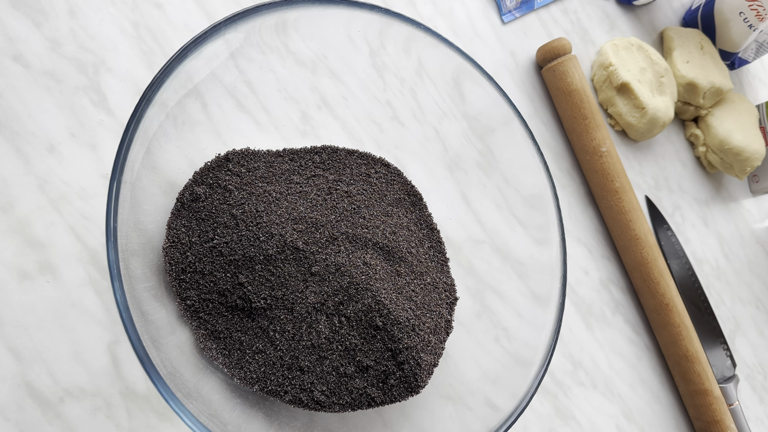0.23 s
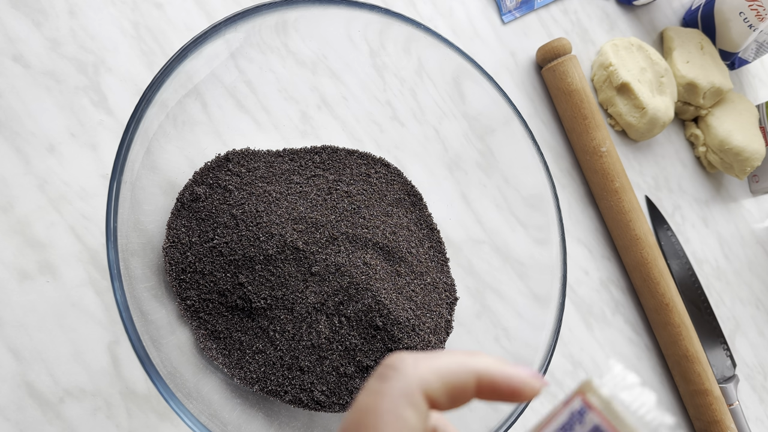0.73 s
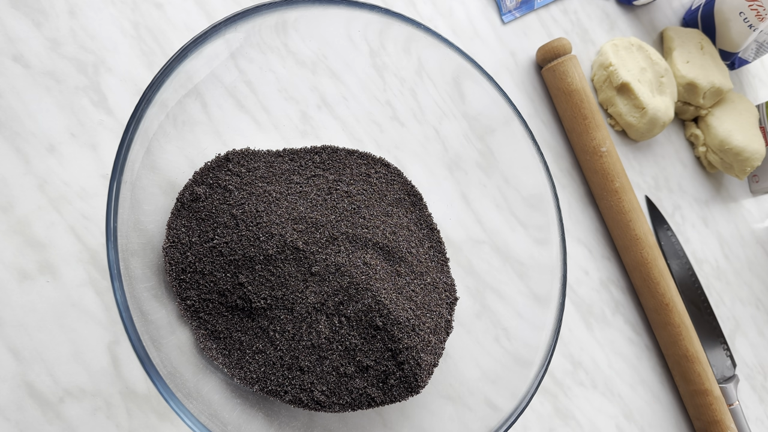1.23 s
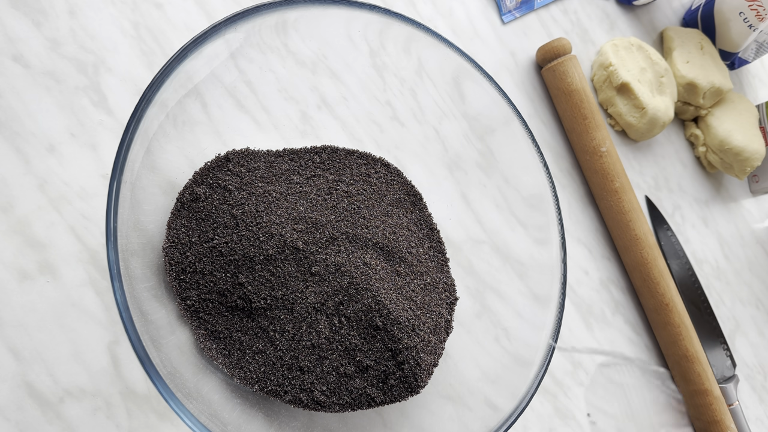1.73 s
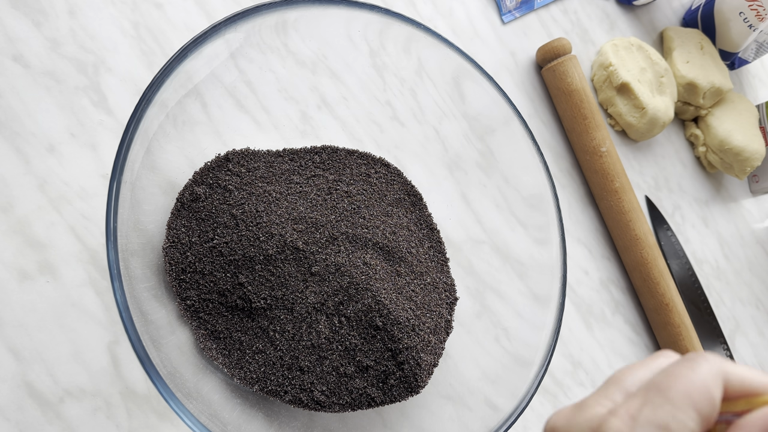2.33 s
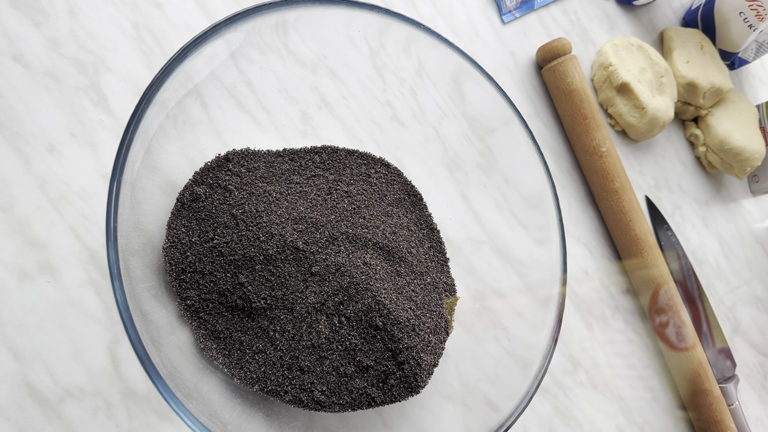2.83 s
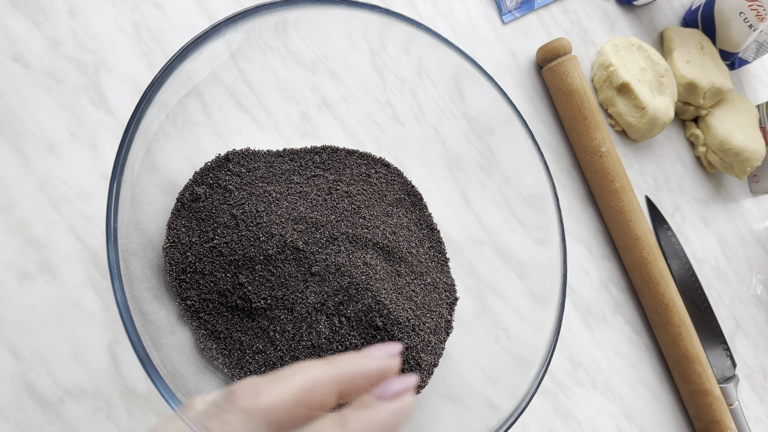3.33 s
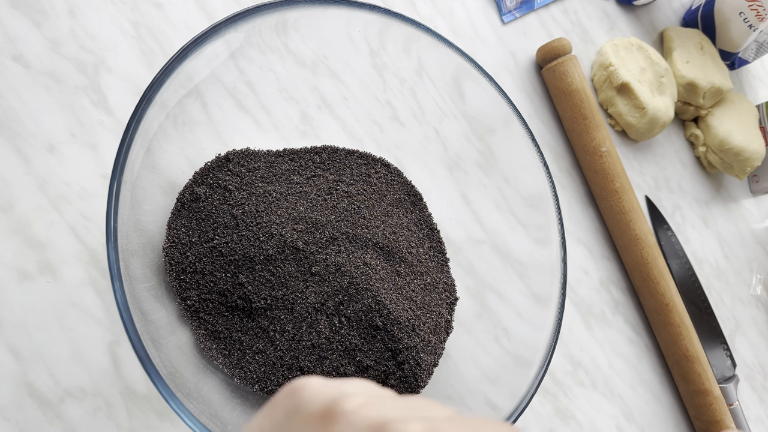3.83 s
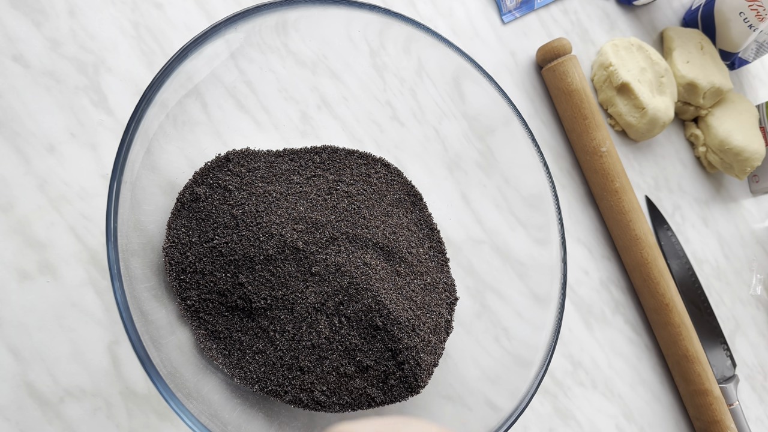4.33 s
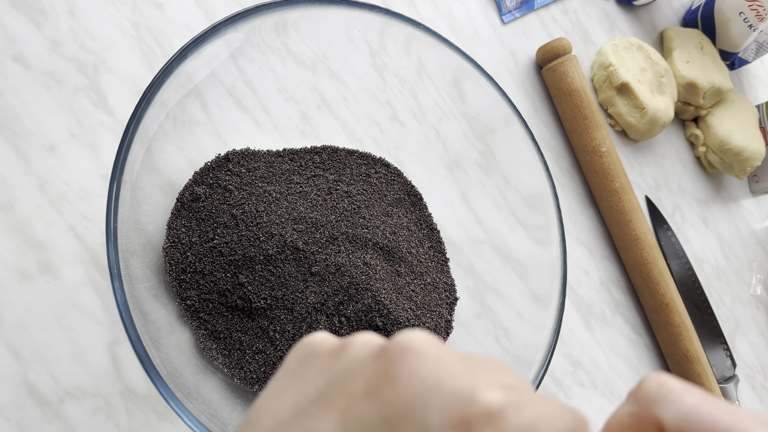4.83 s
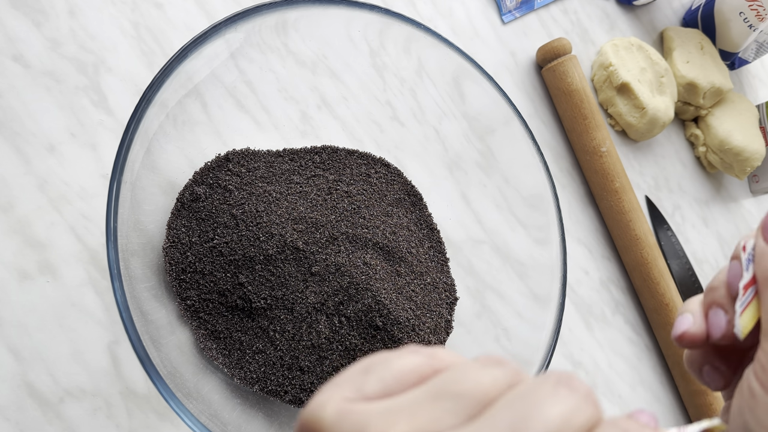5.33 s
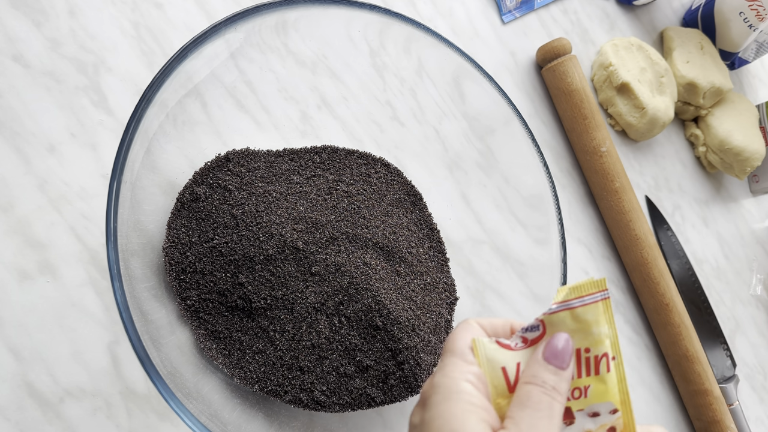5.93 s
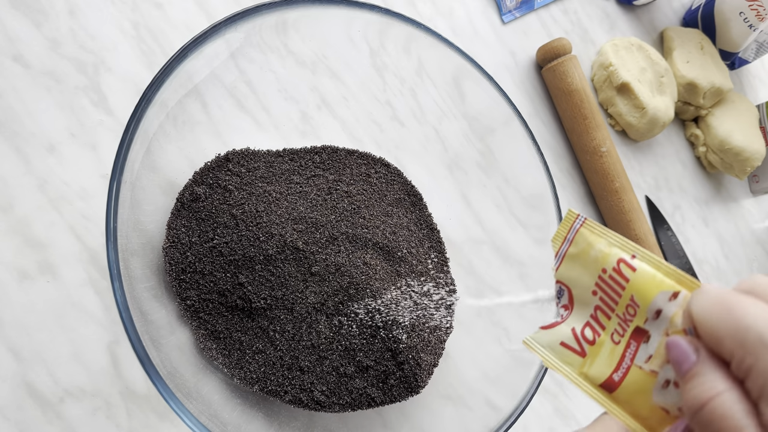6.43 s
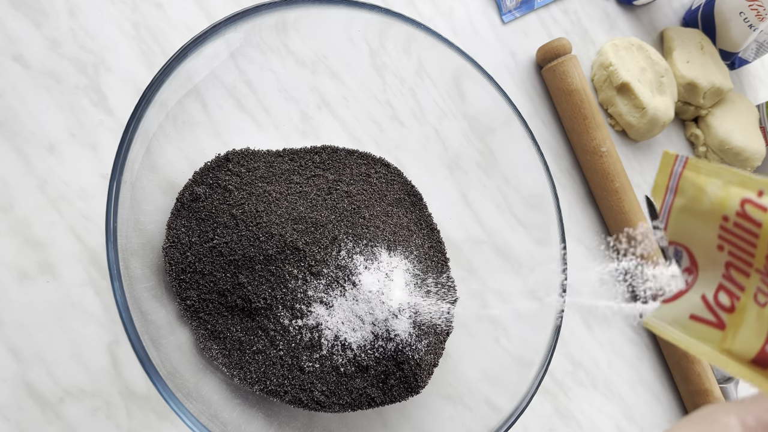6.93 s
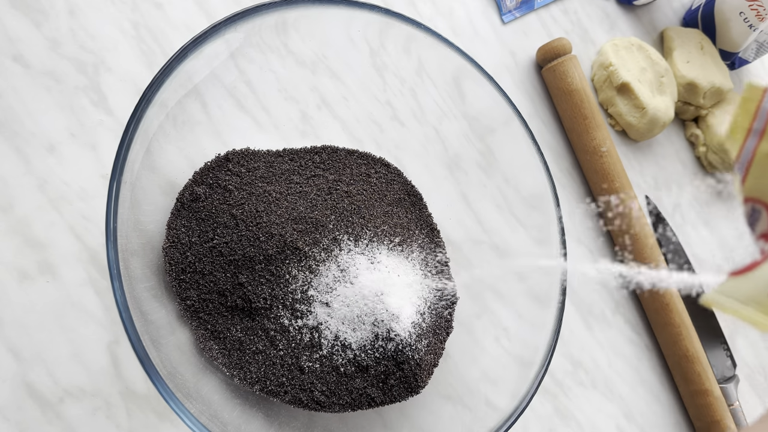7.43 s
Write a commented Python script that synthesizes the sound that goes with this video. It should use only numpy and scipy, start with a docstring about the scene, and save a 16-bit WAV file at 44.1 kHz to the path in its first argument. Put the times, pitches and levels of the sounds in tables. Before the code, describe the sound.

Close, crisp crumpling of a small paper sachet, dense at first, then easing into sliding rustles and a dull hand brush on the table. Sparse crackles follow as another sachet is picked up, ripped open briskly, and emptied in a faint fine hiss. A low appliance hum runs beneath; small live kitchen, close stereo microphone.

```python
"""Crumpled paper: small sugar sachets are handled close by over a kitchen table, and an appliance hums.
The first is crumpled; the next is picked up, torn open and its sugar poured into a bowl. Creases are shaped
noise pulses and a click that ring panel resonances; rustle, tearing fibres, a brushing hand and sugar are random
clicks through resonators. Table and bowl echo, the kitchen reverberates; hum is sines, room air filtered noise.
Each squeeze of the fingers swells the rustle by one rule. Levels [dB] are relative, before any layer gain."""
import sys
import numpy as np
from scipy import signal
from scipy.fft import rfft, irfft, next_fast_len
from scipy.io import wavfile
from scipy.ndimage import uniform_filter1d, map_coordinates

SR = 44100
rng = np.random.default_rng(int(sys.argv[2]) if len(sys.argv) > 2 else 0)


def pcm_store(signal):
    """Save signal as 16-bit PCM."""
    levels = np.round(np.clip(np.atleast_2d(signal), -1, 1) * 32767)
    wavfile.write(sys.argv[1], SR, levels.astype(np.int16).T)


N = 339570
TOP_HZ = 15900  # upper limit of the band


def amp(db):
    """Decibel law: level to amplitude gain."""
    return 10 ** (np.asarray(db) / 20)


def unit(x):
    """Normalisation to an rms of 1."""
    return x / np.sqrt(np.mean(x ** 2) + 1e-20)


def along(points, hz):
    """Interpolation of (frequency [Hz], value) points on a logarithmic frequency axis."""
    f, v = np.transpose(points)
    return np.interp(np.log(hz + 1), np.log(f + 1), v)


def levels(rows):
    """Envelopes linear in decibels: one gain curve per level column, -120 dB before the first row."""
    s, *columns = np.transpose(rows)
    t = np.arange(N) / SR
    return [amp(np.interp(t, s, column, left=-120)) for column in columns]


def wobble(rate):
    """Slow random modulation: a smooth curve through rate random knots a second."""
    knots = rng.standard_normal(int(N * rate / SR) + 4)
    return map_coordinates(knots, [np.arange(N) * rate / SR])


def filtered(x, response):
    """Linear filtering: the spectrum of x times a complex response of frequency."""
    m = next_fast_len(N + SR // 2)
    hz = np.fft.rfftfreq(m, 1 / SR)
    return irfft(rfft(x, m) * response(hz), m)[..., :N]


def causal(db):
    """Minimum phase by folding the cepstrum: a response with these gains that rings only after the blow."""
    cepstrum = irfft(np.log(amp(db) + 1e-9))
    half = len(cepstrum) // 2
    fold = np.r_[1, np.full(half - 1, 2), 1, np.zeros(half - 1)]
    return np.exp(rfft(cepstrum * fold))


def ring(x, spectrum, size=2048):
    """Convolution: each click excites one impulse response with the given spectrum."""
    pulse = irfft(causal(along(spectrum, np.fft.rfftfreq(size, 1 / SR))))
    return signal.oaconvolve(x, pulse[None], axes=1)[:, :N]


def bump(hz, centre, octaves):
    """Resonance curve on an octave scale, 1 at its centre and 1/2 at the given distance in octaves."""
    return 1 / (1 + (np.log2((hz + 1) / centre) / octaves) ** 2)


def grains(rate, spread_db, apart):
    """Random impulses: rate clicks a second of scattered size, each of its own strength at the two ports."""
    chance, size, lean = rng.random(N), rng.standard_normal(N), rng.standard_normal(N)
    heights = amp(spread_db * np.minimum(size, 2))
    clicks = (chance < rate / SR) * heights * rng.choice([-1, 1], N)
    return clicks * np.array([1 + apart * lean, 1 - apart * lean])


def avalanches(rate, life, calm):
    """Avalanche statistics: buckling bursts, rate a second, decay with time constant life [s] over a calm share."""
    starts = (rng.random(N) < rate / SR) * rng.uniform(.4, 1, N)
    power = signal.lfilter([1], [1, -np.exp(-2 / (life * SR))], starts ** 2)
    return np.sqrt((calm + power / power.mean()) / (calm + 1))


def buckles(x, spectrum, low_hz, high_hz, peak_db, octaves=0.74, size=1024, count=6):
    """Local resonance: every few milliseconds a random facet takes the pulses and rings at its own pitch."""
    hz, hop = np.fft.rfftfreq(size, 1 / SR), SR // 160
    turn = rng.integers(count, size=N // hop + 1).repeat(hop)[:N]
    out = np.zeros((2, N))
    for k, pitch_hz in enumerate(np.geomspace(low_hz, high_hz, count)):
        pulse = irfft(causal(along(spectrum, hz) + peak_db * bump(hz, pitch_hz, octaves)))
        out += signal.oaconvolve(x * (turn == k), pulse[None], axes=1)[:, :N]
    return unit(out)


# left-right likeness of diffuse sound: (frequency [Hz], coherence [0-1])
COHERENCE = [(60, 0.94), (130, 0.94), (300, 0.61), (640, 0), (1400, 0.23), (4000, 0)]


def diffuse(pair):
    """Diffuse-field coherence: two unrelated signals are made alike in the bass, as sound from all sides is."""
    hz = np.fft.rfftfreq(pair.shape[1], 1 / SR)
    turn = np.arccos(np.clip(along(COHERENCE, hz), -1, 1)) / 2
    mid, side = rfft(pair) * [np.cos(turn), np.sin(turn)]
    return irfft([mid + side, mid - side], pair.shape[1])


# mains hum of the appliance: (frequency [Hz], rms level [dB])
HUM_LINES = [(49, -54), (98, -64.5), (150, -76), (300, -73)]
# colour of the room air: (frequency [Hz], level per Hz [dB])
AIR_COLOUR = [(20, -13), (45, -4), (62, -1.5), (83, 10), (115, -4.5), (150, 0.5), (200, -16), (310, -7.5),
              (600, -13), (1000, -22), (1600, -37), (5000, -35), (15000, -76)]
# level of the low hum band between 65 and 125 Hz over time: (time [s], level [dB])
HUM_BAND_LEVEL = [(0, 1.5), (2.75, -2.5), (3.1, -8), (3.55, -6.5), (3.95, -2)]


def background():
    """Additive synthesis: unsteady sine hum over air noise; the level between 65 and 125 Hz varies with time."""
    t = np.arange(N) / SR
    hum = np.zeros(N)
    for hz, db in HUM_LINES:
        height = np.sqrt(2) * amp(db + 2.0 * wobble(3.6))
        hum += height * np.sin(2 * np.pi * hz * t + 0.238 * wobble(2.0))
    noise = diffuse(rng.standard_normal((2, N)))
    air = unit(filtered(noise, lambda hz: amp(along(AIR_COLOUR, hz))))
    floor = hum + amp(-56.5) * air
    band_gain, = levels(HUM_BAND_LEVEL)
    hum_band = filtered(floor, lambda hz: (hz > 65) & (hz < 125))
    return floor + (band_gain - 1) * hum_band


# how firmly the hands keep working the paper between squeezes: (time [s], rustle level [dB])
GRIP_LEVEL = [(0, -38.5), (1.33, -36.5), (1.41, -43.5), (1.5, -36.5), (1.77, -41), (2.18, -40), (2.25, -47),
              (2.7, -54.5), (2.87, -70.5), (3.15, -55), (3.5, -59.5), (3.75, -54), (4.1, -64.5),
              (4.33, -60), (4.43, -49), (4.64, -60), (4.74, -62), (4.9, -52), (5.02, -61), (5.45, -62.5),
              (5.75, -56), (5.92, -56), (6.15, -65), (7.7, -85)]
# the fingers squeeze or shift the sachet:
# (time [s], length [s], crisp rustle level [dB], flexing panel level [dB])
FINGER_SQUEEZES = [(0.0, 0.017, -26.5, -50), (0.145, 0.02, -23.5, -42), (0.187, 0.017, -24, -33.5),
                   (0.25, 0.022, -27, -53.5), (0.374, 0.044, -32, -47), (0.554, 0.026, -49, -64),
                   (0.697, 0.012, -32, -50), (0.842, 0.09, -30.5, -45), (0.965, 0.06, -32, -57),
                   (1.12, 0.13, -32, -49.5), (1.273, 0.1, -42, -50.5), (1.558, 0.0071, -31.5, -55),
                   (1.596, 0.071, -36.5, -57), (1.833, 0.058, -36.5, -49), (1.913, 0.03, -26.5, -45),
                   (1.974, 0.096, -28, -38.5), (2.089, 0.082, -26.5, -39), (2.517, 0.025, -39, -47),
                   (2.584, 0.094, -53, -46.5), (2.929, 0.023, -57, -61), (3.043, 0.019, -41, -50),
                   (3.131, 0.027, -44, -63), (3.428, 0.071, -50, -52.5), (3.601, 0.029, -42.5, -48.5),
                   (4.385, 0.015, -39, -41.5), (4.44, 0.17, -54, -67), (4.664, 0.062, -51, -60),
                   (4.767, 0.023, -41, -40), (4.844, 0.0078, -32, -55), (4.913, 0.04, -41, -52.5),
                   (5.075, 0.082, -41.5, -77), (5.916, 0.013, -42, -50.5), (6.014, 0.024, -42, -65),
                   (6.665, 0.063, -54, -59), (7.368, 0.04, -48, -56)]
SQUEEZE_RISE_S, SQUEEZE_FALL_S = 0.019, 0.041  # seconds per 20 dB before and after
SQUEEZE_SAG_DB = 3  # easing while it lasts
GRIP_FLEX_DB, FLEX_GROWS = -65.5, 0.37  # panels flexing at the median grip; dB more for each dB of grip


def handling():
    """Addition of powers: a grip and squeezes that rise, ease and let go drive crisp rustle and flexing panels."""
    t = np.arange(N) / SR
    grip, = levels(GRIP_LEVEL)
    crisp = grip ** 2
    flex = (amp(GRIP_FLEX_DB) * (grip / np.median(grip)) ** FLEX_GROWS) ** 2
    for s, length, crisp_db, flex_db in FINGER_SQUEEZES:
        early, late = np.maximum(s - t, 0), np.maximum(t - s - length, 0)
        slopes_db = -20 * (early / SQUEEZE_RISE_S + late / SQUEEZE_FALL_S)
        sag_db = SQUEEZE_SAG_DB * np.clip((t - s) / length, 0, 1)
        power = amp(slopes_db - sag_db) ** 2
        crisp = crisp + amp(crisp_db) ** 2 * power
        flex = flex + amp(flex_db) ** 2 * power
    return np.sqrt(crisp), np.sqrt(flex)


# colour of the creased sheet, which the snaps share: (frequency [Hz], level per Hz [dB])
PAPER_COLOUR = [(60, -17), (200, -14), (480, -8), (620, -9.5), (800, -5.5), (1050, -7), (1550, -8),
                (2500, -3), (3200, -6.5), (4200, -3.5), (5200, -4.5), (7200, -0.5), (9800, 0), (11500, -8),
                (15500, -1)]
# colour of its wide panels: (frequency [Hz], level per Hz [dB])
PANEL_COLOUR = [(50, -0.5), (140, -6), (350, 10), (800, 3), (1200, 1.5), (1600, 4), (2400, 1.5),
                (3300, 3.5), (8000, -32)]
CRUMPLE_END_S = 1.6  # crumpling gives way to sliding between the fingers
TICKS_PER_S, POPS_PER_S = 75, 26  # small creases that tick; slack panels that pop


def rustle():
    """Buckling noise: bursts of tiny buckles and ticks over wider panels that flex dully and pop."""
    crisp, flex = handling()
    # crumpling is nearly all bursts; sliding between the fingers afterwards is more even
    sliding = np.where(np.arange(N) / SR < CRUMPLE_END_S, .15, 1.1)
    bursts = avalanches(rate=170, life=.0016, calm=sliding)
    fine = unit(bursts * grains(rate=7000, spread_db=3.0, apart=0.017))
    creases = avalanches(rate=TICKS_PER_S, life=0.0011, calm=0)
    ticks = unit(creases * grains(rate=12000, spread_db=3.0, apart=0.44)) / (1 + sliding)
    dull = unit(np.sqrt(bursts) * grains(rate=1500, spread_db=3.5, apart=0.38))
    slack = avalanches(rate=POPS_PER_S, life=0.0025, calm=0)
    pops = unit(slack * grains(rate=4400, spread_db=4.5, apart=0.33))
    small = buckles(fine + amp(-9.5) * ticks, PAPER_COLOUR, low_hz=2360, high_hz=13800, peak_db=5.5)
    wide = buckles(dull + amp(-1.0) * pops, PANEL_COLOUR, low_hz=408, high_hz=2990, peak_db=3.5)
    return amp(-2.0) * crisp * small + amp(-3.5) * flex * wide


# the creases that snap through: (time [s], level over 5 ms [dB], body from wide flexing [dB],
# panel pitch [Hz], panel ring [dB], noise t60 [s])
CREASE_SNAPS = [(0.0219, -26, 5, 1330.0, 0, 0.022), (0.0422, -29, -9, 660, 10, 0.0092),
                (0.0832, -22, -10, 2780, 9, 0.0083), (0.101, -22, 5.5, 900, 7, 0.007),
                (0.1404, -28, -13, 740, 7, 0.031), (0.16, -22.5, 2.5, 700, 11, 0.022),
                (0.1664, -22.5, -9, 7000, -5, 0.014), (0.1899, -20, -5, 780.0, 11, 0.017),
                (0.198, -22.5, 5, 2670, 9.5, 0.017), (0.2092, -24.5, 1, 4160, 9, 0.021),
                (0.2497, -21.5, -4, 785, 9, 0.011), (0.2525, -24.5, -2, 850.0, 10, 0.008),
                (0.2746, -29.5, -7, 6800, 9, 0.0069), (0.332, -26, -2.5, 694, 10, 0.019),
                (0.3387, -26, -15, 11000, -5, 0.004), (0.3827, -31, -15, 680.0, 4, 0.01),
                (0.3957, -28, 5, 2560, 6, 0.036), (0.4122, -30.5, 21.5, 6060, 14, 0.027),
                (0.44, -34, 2, 3380.0, 17, 0.021), (0.4934, -30, -1, 8600, 13, 0.0046),
                (0.5006, -27.5, -8, 4600, 6, 0.02), (0.5294, -27, -25, 890.0, 7, 0.014),
                (0.563, -38, 1, 650.0, 8.0, 0.008), (0.5934, -28, 2, 4800, 11, 0.0077),
                (0.6134, -19, -28, 11900, -3, 0.0028), (0.63, -35, 12, 3360, 13, 0.011),
                (0.6931, -23.5, -1, 1040, 11, 0.024), (0.6982, -29.5, 1, 895, 3, 0.027),
                (0.7093, -30.5, -2, 680.0, 12, 0.0049), (0.7351, -27.5, 3.5, 1080, 4, 0.012),
                (0.7566, -30, 2, 5500, -6, 0.025), (0.762, -22.5, -4.5, 5700, 4, 0.0062),
                (0.8526, -36, 14, 1280, 11, 0.031), (0.8811, -21, -8, 6200, 1, 0.006),
                (0.8888, -21.5, -10, 11500, 11, 0.0059), (0.919, -37, 8, 1170, 14, 0.016),
                (0.999, -24, -4, 2500, 6, 0.0064), (1.0127, -21, 1, 5230, 1, 0.01),
                (1.0474, -27.5, -8, 1980.0, 11, 0.0083), (1.07, -28, -16, 1580.0, 10, 0.0046),
                (1.0848, -25.5, -2, 1970, 7, 0.0029), (1.092, -22.5, -20, 650.0, 19, 0.0081),
                (1.201, -19.5, -13, 11100, 3, 0.008), (1.2133, -29.5, 4, 1810.0, 2, 0.0054),
                (1.2229, -26.5, -6.5, 650.0, 7, 0.021), (1.233, -24.5, -5, 6300.0, 1, 0.019),
                (1.3054, -29.5, -10, 1390.0, 12, 0.0037), (1.318, -24, -20, 890.0, 5, 0.0051),
                (1.362, -38, 14, 1200, 5, 0.008), (1.3843, -30, -12, 740.0, 0, 0.015),
                (1.4454, -31, 9, 9500, 10.5, 0.014), (1.496, -29, -18, 4220.0, 8, 0.025),
                (1.5182, -34.5, 0, 3380.0, 5, 0.013), (1.5352, -33, -11, 650.0, 7, 0.0084),
                (1.562, -24.5, -18, 2070.0, 7, 0.033), (1.6, -36.5, 20, 1100, 11, 0.0077),
                (1.6133, -40, 4, 1200, 9, 0.0053), (1.641, -30.5, -9, 1730.0, 10, 0.012),
                (1.7008, -27, -13, 1650, 15, 0.0022), (1.74, -27.5, -5, 910, 12, 0.0045),
                (1.7526, -30.5, 0, 6700, 9, 0.018), (1.8038, -33, 0, 810.0, 6, 0.018),
                (1.8115, -23.5, -8.5, 1600, 9.5, 0.033), (1.8269, -28, 6, 8230.0, 8, 0.013),
                (1.8966, -28, -6, 1190, 14, 0.015), (1.9165, -28.5, -10, 3380.0, 0, 0.01),
                (1.9374, -30, 11.5, 7200.0, 10, 0.019), (1.983, -25.5, 1.5, 1720, 8, 0.041),
                (2.094, -26.5, 8, 7040, 24, 0.013), (2.1319, -29.5, 0.5, 710.0, 16.5, 0.015),
                (2.2608, -41.5, 23, 5760.0, 9, 0.032), (2.2952, -38, 0, 3000, 4, 0.023),
                (2.4296, -39, 5, 1070, 6, 0.014), (2.436, -37, -3, 6740, 9, 0.021),
                (2.5201, -31.5, -18, 1150, 5, 0.0047), (2.5825, -33.5, 8, 330, 12, 0.029),
                (2.609, -35.5, -1, 2900, 7, 0.022), (2.6482, -32.5, 19.5, 480, 4, 0.022),
                (2.6558, -31.5, 2.5, 2300, -9, 0.012), (2.956, -50.5, 17, 5510.0, 8.0, 0.013),
                (2.9664, -48.5, 20, 4820.0, 11.5, 0.0079), (3.0309, -37, 5.5, 4800, 6, 0.0052),
                (3.1239, -39, 0, 1520.0, 4, 0.0053), (3.135, -47, -11, 805, 7, 0.004),
                (3.147, -39, 7.5, 3200, 9, 0.01), (3.166, -44, -2, 2070.0, 7, 0.0088),
                (3.2665, -46, 12.0, 3230.0, 6, 0.032), (3.291, -41.5, 15.0, 2800, 12.5, 0.007),
                (3.3657, -47.5, 20, 5040.0, 6.0, 0.018), (3.3772, -48, -6.0, 1390.0, 11.0, 0.007),
                (3.3904, -47.5, 21, 3690.0, 12, 0.014), (3.426, -41.5, 12, 650.0, 7, 0.014),
                (3.4849, -46, 12, 4820.0, 14, 0.04), (3.514, -44.5, 9, 750, 9, 0.019),
                (3.582, -36.5, 0.5, 3220, 12, 0.03), (3.5942, -28, -14, 2590.0, 10, 0.0069),
                (3.6218, -31.5, 7.5, 1100, 1.5, 0.025), (3.762, -34.5, -17, 810.0, 15, 0.013),
                (3.7694, -42, 1.5, 2830.0, 11, 0.022), (3.86, -51, 22.0, 1590, 8, 0.022),
                (3.8944, -41.5, -1, 7360, 10, 0.023), (3.8987, -38, -17, 650.0, 5, 0.0039),
                (3.9338, -47, 3, 5070, 19, 0.017), (3.9753, -34.5, -11.5, 2320, 10, 0.023),
                (4.3638, -21.5, -0.5, 9400, 9, 0.03), (4.385, -34, 4, 2200, 12, 0.007),
                (4.398, -29, 7, 1000, 0, 0.02), (4.4412, -33.5, 5, 1000, 8, 0.0088),
                (4.459, -34.5, 6, 2230, 8, 0.013), (4.475, -44, 12, 1100, 4, 0.02),
                (4.4878, -39, 13, 930.0, 6, 0.02), (4.513, -42, -5.0, 2260.0, 14, 0.017),
                (4.5432, -32.5, 9, 2230, 1, 0.013), (4.5605, -42, 18, 2000, 12, 0.0071),
                (4.584, -45.5, 11, 2300, 0, 0.012), (4.6013, -41.5, 24, 4820.0, 12, 0.011),
                (4.661, -38.5, 22, 1510, 4, 0.01), (4.68, -48.5, 22, 1900, 8, 0.016),
                (4.6905, -51, 21, 1900, 8, 0.012), (4.7277, -44, -1.0, 2830.0, 17, 0.024),
                (4.7517, -42, 6.5, 6590.0, 19, 0.0045), (4.763, -41, 20, 1500, 5, 0.012),
                (4.7689, -29, 10, 4740, 7.5, 0.0073), (4.783, -29.5, 4.0, 3650, 14.5, 0.014),
                (4.7912, -36.5, -2, 1450, 14, 0.023), (4.8419, -29.5, -2, 1610, 8, 0.032),
                (5.085, -42, -5, 6000, 2, 0.02), (5.093, -40, 1, 6350, 6, 0.03),
                (5.1262, -34.5, -1, 2500, -2, 0.0094), (5.1325, -27.5, -5, 7750, 18, 0.029),
                (5.1776, -31.5, -2, 1740, 14, 0.05), (5.2661, -27.5, 3, 5510.0, -2, 0.017),
                (5.551, -51.5, 7, 1430, 12, 0.013), (5.6019, -43, 15, 5510.0, 22, 0.009),
                (5.615, -40, 8, 4970, 19, 0.0065), (5.622, -46, -1, 1280, 20, 0.0097),
                (5.9106, -44, 5, 1210, 13, 0.016), (5.926, -45, 8, 1500, 6, 0.0078),
                (5.931, -36.5, 17, 5460, 14, 0.027), (5.982, -49, 10, 1110, 15, 0.0074),
                (5.9954, -35, 12.5, 5640, 13, 0.01), (6.0266, -43, 8, 650, 3, 0.014),
                (6.2025, -38.5, 17.5, 5700, 20, 0.034), (6.599, -37, 13, 6260, 10.5, 0.0047),
                (6.633, -39, 0, 1900, 13.5, 0.018), (6.711, -43, 9, 1300, 6, 0.018),
                (7.3752, -29, 5.5, 3930, 12, 0.005), (7.3774, -40, 9, 1000, 10, 0.012),
                (7.394, -38, -8, 2130, 22, 0.017), (7.414, -62, 2, 1500, 4, 0.012),
                (7.4303, -36, -4, 3260, 14, 0.014), (7.6203, -49, -3, 2300, 10, 0.0063)]
# the clearest of the small creases, which tick once: (time [s], level over 5 ms [dB])
CREASE_TICKS = [(0.027, -25.5), (0.147, -36), (0.1834, -25), (0.228, -26), (0.299, -32), (0.3452, -35),
                (0.463, -36), (0.4735, -43), (0.547, -34), (0.577, -34), (0.7233, -39), (0.7373, -37),
                (0.741, -40), (0.78, -31), (0.8253, -31), (0.8412, -37), (0.9655, -28.5), (1.034, -27),
                (1.1205, -32), (1.237, -26), (1.2721, -33), (1.331, -35), (1.4766, -35), (1.6759, -38),
                (1.6917, -48), (1.7094, -33), (1.7891, -45), (2.117, -26), (2.3584, -47), (2.47, -42),
                (3.0513, -47), (3.9634, -48), (4.3944, -36), (4.78, -39), (4.95, -42), (5.006, -46),
                (5.0625, -46), (5.0689, -46)]
# what all those ticks share
TICK_BODY_DB, TICK_PANEL_HZ, TICK_PANEL_DB, TICK_T60_S = -8.5, 5130, -1.5, 0.0049


def snaps(noise=1.55, click=1.46, click_s=0.0068, linger_s=0.014, bend=.58, bend_hz=4200,
          evenness=0.43, facet_db=2.5, apart=0.36, wide_hz=3300, panel_octaves=0.34, size=2048, count=16):
    """Snap-through buckling: noise swells up to a click and decays, coloured by a panel and random facets."""
    out = np.zeros((2, N + size))
    lead = SR // 400  # the window starts 2.5 ms before the click
    t, hz = (np.arange(size) - lead) / SR, np.fft.rfftfreq(size, 1 / SR)
    wide = 1 / (1 + (hz / wide_hz) ** 4)
    slow = bend / (1 + (hz / bend_hz) ** 4)
    facet_hz = np.geomspace(300, TOP_HZ, count)
    ticks = [(s, db, TICK_BODY_DB, TICK_PANEL_HZ, TICK_PANEL_DB, TICK_T60_S) for s, db in CREASE_TICKS]
    for s, db, body_db, panel_hz, panel_db, t60 in CREASE_SNAPS + ticks:
        swell = amp(np.minimum(7 * 60 * t / t60, -60 * t / t60))  # rises seven times as fast as it decays
        shared, own = rng.standard_normal((2, size)) * rng.exponential(1, size) ** .6 * swell
        push = np.array([shared + apart * own, shared - apart * own])
        push *= noise / np.linalg.norm(shared)
        push[:, lead] += click * np.exp(-t60 / click_s)  # a shorter snap has more click

        # the wide, slow bending of the sheet outlasts the first noise
        flutter = rng.standard_normal(size) * (t >= 0) * amp(-60 * np.abs(t) / (t60 + linger_s))
        flutter *= np.linalg.norm(push[0]) / np.linalg.norm(flutter)
        blow = (1 - slow) * rfft(push) + slow * rfft(flutter)

        # part of the blow's own unevenness is smoothed out of the lower spectrum
        power = uniform_filter1d(np.mean(np.abs(blow) ** 2, axis=0), size=24)
        even = -10 * evenness * wide * np.log10(power)
        facets = np.interp(hz, facet_hz, facet_db * rng.standard_normal(count))
        octaves = panel_octaves * np.sqrt(abs(panel_db) / 10 + 1e-9)  # a stronger ring is broader
        panel = panel_db * bump(hz, panel_hz, octaves)
        colour = even + along(PAPER_COLOUR, hz) + body_db * wide + panel + facets
        snap = irfft(blow * causal(colour) * (hz < TOP_HZ))
        rms = np.sqrt(np.mean(snap[:, lead:lead + SR // 200] ** 2))
        out[:, round(s * SR) - lead:][:, :size] += amp(db) * snap / rms
    return amp(-1.04) * out[:, :N]


# the flat faces of a sachet keep ringing faintly: (frequency [Hz], bandwidth [Hz], level [dB])
FACE_MODES = [(1187, 70, -8), (2366, 154, -10.5)]


def faces(x):
    """Modal resonance: the paper's sounds stir the few damped modes of the sachet's flat faces."""
    def modes(f):
        return sum(amp(db) * 1j * f * w / (hz * hz - f * f + 1j * f * w) for hz, w, db in FACE_MODES)
    return filtered(x, modes)


def table_top(x, count=12, order=5):
    """Early reflection: table and bowl return weak copies within 15 ms; paths change in turn for moving hands."""
    out = np.zeros((2, N))
    turn = np.arange(N) // (SR // 25) % order
    for place in range(order):
        copies = np.zeros(SR // 50)
        copies[rng.integers(SR // 1200, SR // 70, count)] = rng.choice([-1, 1], count)
        out += signal.oaconvolve(x * (turn == place), copies[None] / np.sqrt(count), axes=1)[:, :N]
    return out


# reverberation of the kitchen: (frequency [Hz], t60 [s])
KITCHEN_T60 = [(200, 0.25), (800, 0.22), (2500, 0.23), (6000, 0.25), (15000, 0.0043)]


def kitchen(x, count=4):
    """Reverberation: decaying diffuse noise, top treble dying first; tails change in turn for moving hands."""
    out = np.zeros((2, N))
    turn = np.arange(N) // (SR // 9) % count
    for place in range(count):
        hz, t, z = signal.stft(rng.standard_normal((2, SR // 2)), SR, nperseg=256)
        decay = amp(-60 * t / along(KITCHEN_T60, hz)[:, None]) * (1 - np.exp(-t / 0.0004))
        tail = diffuse(signal.istft(z * decay, SR, nperseg=256)[1])
        tail = tail / np.linalg.norm(tail[0])
        part = (x[0] * (turn == place))[None]
        out += signal.fftconvolve(part, tail, axes=1)[:, :N]
    return out


# a hand brushes along the table top: (time [s], level [dB])
BRUSH_LEVEL = [(1.85, -85), (2.0, -59.5), (2.15, -50.5), (2.3, -68), (2.5, -67), (2.6, -52.5), (2.72, -91)]
# colour of the table top: (frequency [Hz], level per Hz [dB])
TABLE_COLOUR = [(60, -26), (150, 3.5), (350, -3), (1500, -41.5)]


def brush():
    """Stick-slip friction: skin catches and slips in random clicks, and the table top answers dully."""
    pressure, = levels(BRUSH_LEVEL)
    slips = grains(rate=1100, spread_db=9.5, apart=0.089)
    return pressure * unit(ring(slips, TABLE_COLOUR))


# the pull that tears the top off: (time [s], level [dB])
TEAR_LEVEL = [(5.123, -42), (5.127, -29.5), (5.172, -23.5), (5.178, -23), (5.208, -20.5), (5.236, -20.5),
              (5.264, -29), (5.276, -58)]
# colour of the tearing fibres: (frequency [Hz], level per Hz [dB])
FIBRE_COLOUR = [(100, -28.5), (450, -16.5), (850, -8), (1050, -11.5), (2250, -7), (2680, 3.5), (2950, -6.5),
                (3300, -5), (4500, -5.5), (7500, -1), (9500, 6.5), (12500, -6.5), (14300, 14), (15500, 6)]


def tear():
    """Progressive fracture: fibres break in a fast, dense run and ring the taut sachet at changing pitches."""
    pull, = levels(TEAR_LEVEL)
    bundles = avalanches(rate=500, life=.0008, calm=1)
    breaks = bundles * grains(rate=29000, spread_db=-2, apart=0.076)
    tearing = np.arange(N) / SR < TEAR_LEVEL[-1][0]
    return tearing * pull * buckles(breaks, FIBRE_COLOUR, low_hz=900, high_hz=14000, peak_db=7)


# sugar slides inside the sachet as it tilts, then flows out: (time [s], level [dB])
POUR_LEVEL = [(5.77, -69), (5.83, -53.5), (6.12, -53), (6.165, -44), (6.21, -48), (6.25, -49), (6.41, -44),
              (6.57, -45), (6.72, -42), (6.8, -46.5), (6.83, -52), (7.3, -53.5), (7.7, -58)]
# colour of the sliding sugar: (frequency [Hz], level per Hz [dB])
SUGAR_COLOUR = [(200, -37), (900, -25), (1250, -10), (1700, -10.5), (2500, -1), (3200, -6), (4200, -2),
                (5500, 0), (7400, 5), (9700, 4), (11300, -36), (15500, 5)]


def sugar():
    """Granular flow: thousands of fine crystals slide down the paper in little slumps and over its lip."""
    flow, = levels(POUR_LEVEL)
    slumps = amp(.7 * wobble(35)) * avalanches(rate=140, life=.003, calm=8)
    crystals = slumps * grains(rate=14000, spread_db=3.5, apart=.2)
    return amp(3.5) * flow * unit(ring(crystals, SUGAR_COLOUR))


# the two microphone ports: (frequency [Hz], phase by which the left lags [rad])
PORT_LAG = [(1900, 0), (2700, -.8), (4000, -.1), (6200, .4), (8000, 1.8), (9700, 2.8), (13500, 3.25),
            (15600, 4.1)]


def scene(soft_hz=8600):
    """Superposition: near sounds with a phase difference between the ports, duller room sound and background."""
    paper = snaps() + rustle() + tear()
    near = paper + faces(paper) + brush() + sugar()
    sides = np.array([[-1], [1]])  # left, right
    direct = filtered(near, lambda hz: np.exp(.5j * along(PORT_LAG, hz) * sides))
    soft = filtered(near, lambda hz: 1 / np.sqrt(1 + (hz / soft_hz) ** 4))
    room = kitchen(soft)
    return direct + amp(-11.5) * table_top(direct) + amp(-8) * room + background()


def record(dry):
    """Band limitation: a very steep low-pass removes what lies above the upper limit."""
    return filtered(dry, lambda hz: 1 / np.sqrt(1 + (hz / TOP_HZ) ** 160))


dry = scene()
out = record(dry)
pcm_store(out)
```